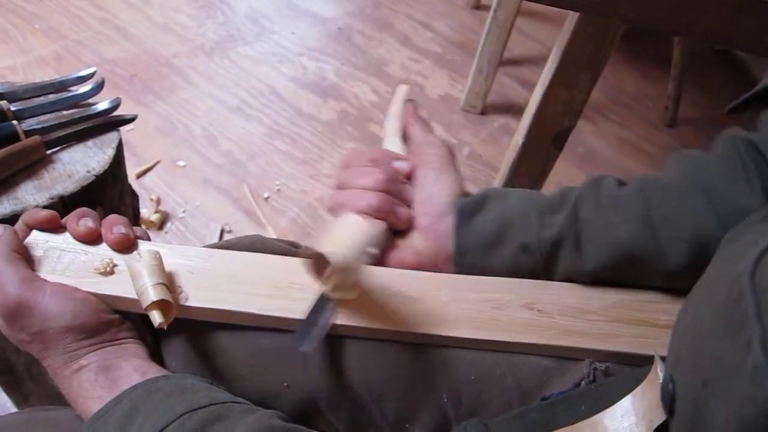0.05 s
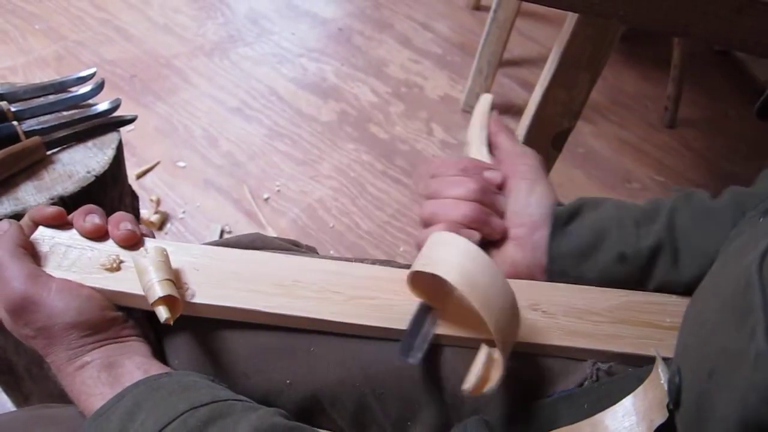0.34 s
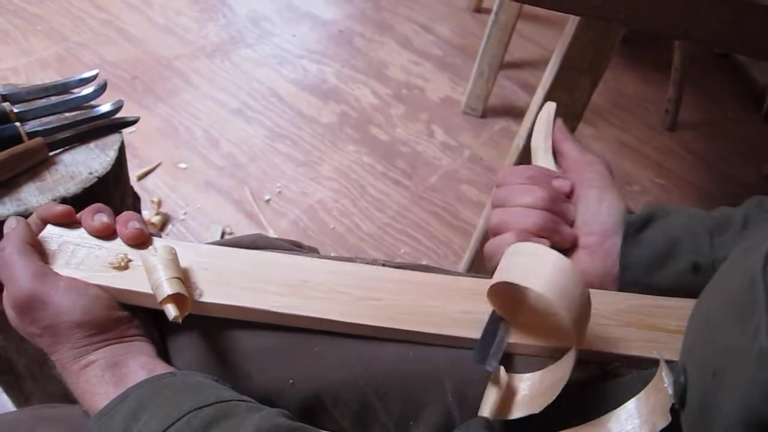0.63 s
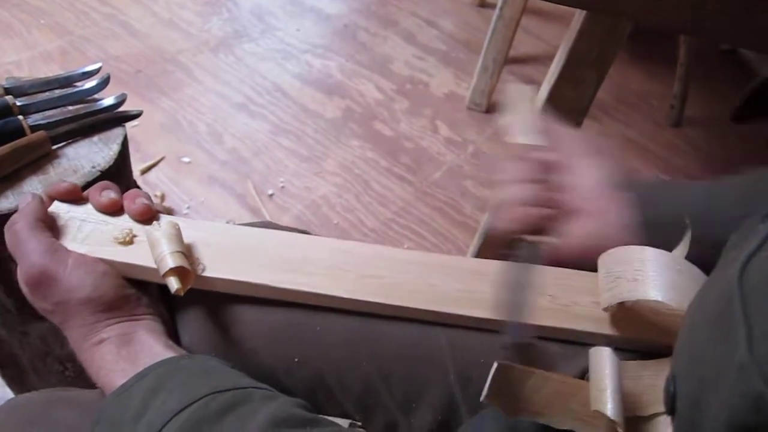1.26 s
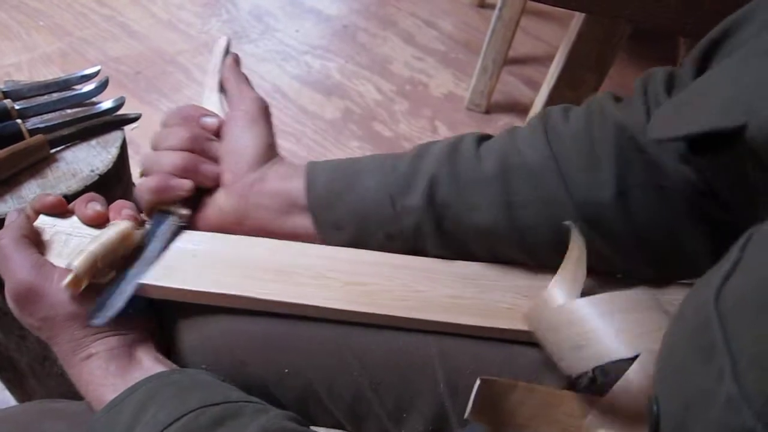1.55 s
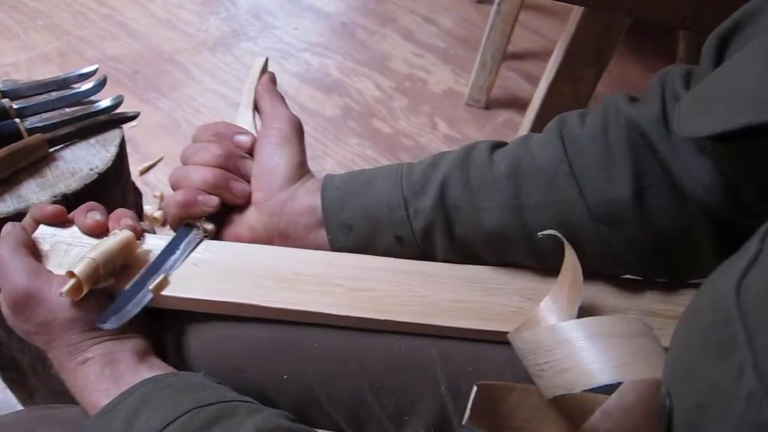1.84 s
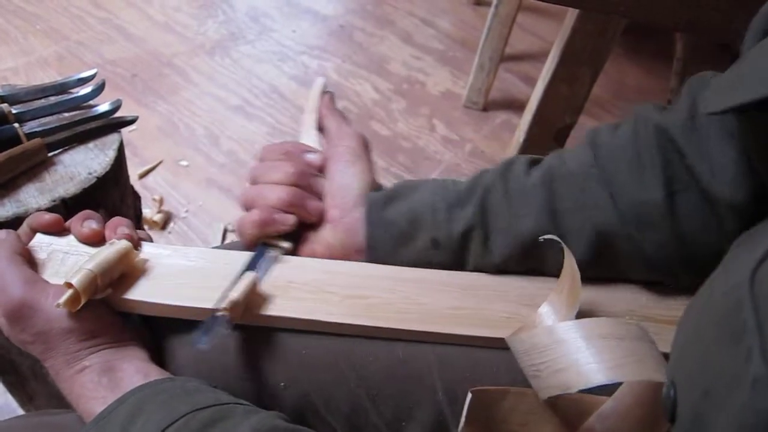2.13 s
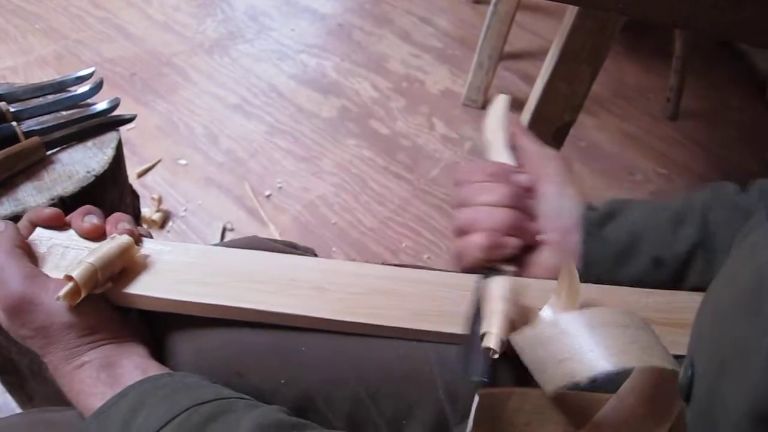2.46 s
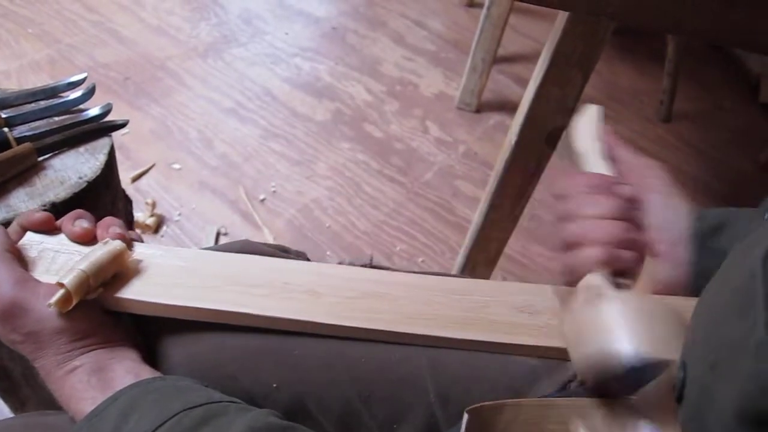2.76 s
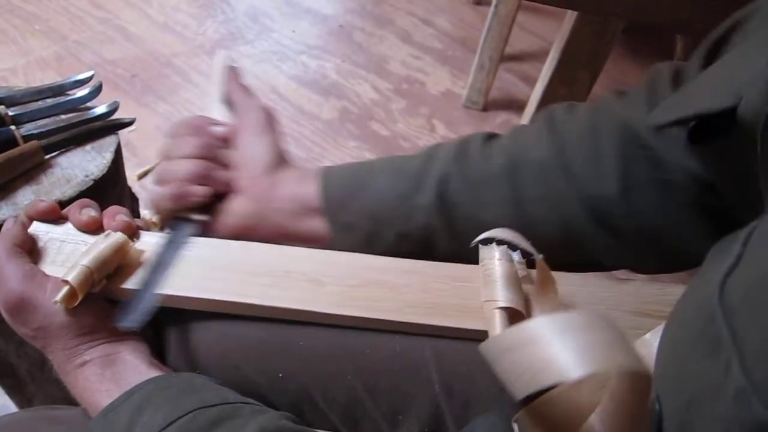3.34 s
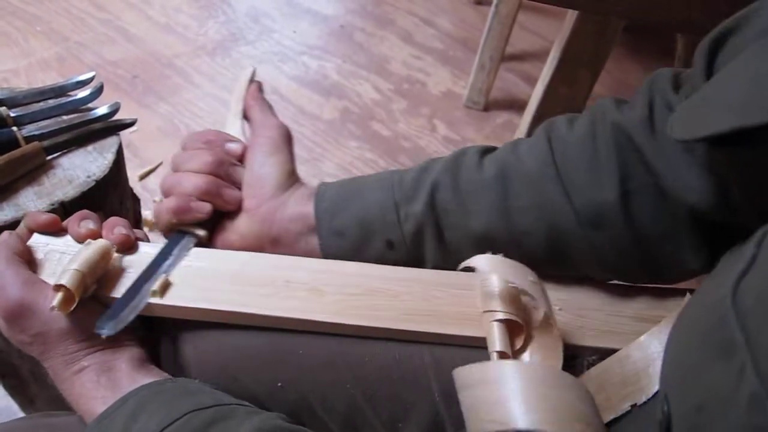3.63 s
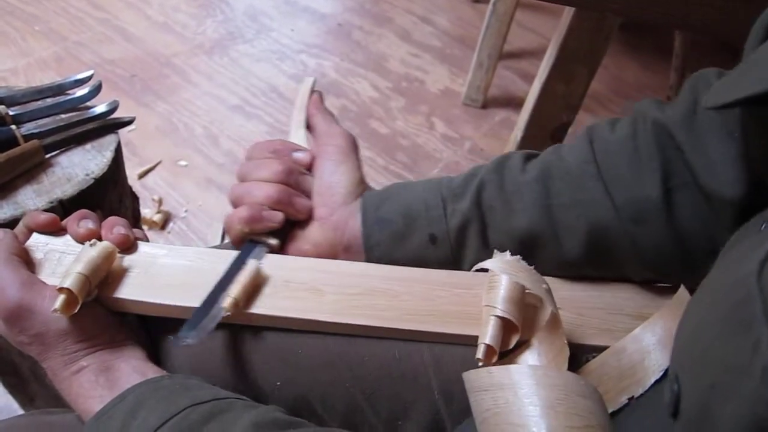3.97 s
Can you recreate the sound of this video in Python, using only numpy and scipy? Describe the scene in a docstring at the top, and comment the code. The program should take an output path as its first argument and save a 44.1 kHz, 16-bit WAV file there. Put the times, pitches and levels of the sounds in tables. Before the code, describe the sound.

Close knife carving on wood, rasping and crackling as shavings peel off in a small room.

```python
"""In a small room, close by, a knife is pulled along a piece of wood held on the lap.
The edge sticks and slips, breaking fibres: the wood thrums and rasps, the curling shaving crackles.
Two shavings are cut and torn free, a sleeve rustles as the arm goes back, and a third cut begins.
Now and then blade and wood knock lightly together."""
import sys
import numpy as np
from scipy import signal
from scipy.fft import rfft, irfft, next_fast_len
from scipy.io import wavfile
from scipy.ndimage import uniform_filter1d

SR = 44100
rng = np.random.default_rng(int(sys.argv[2]) if len(sys.argv) > 2 else 0)


def master_out(mix):
    """Clip the mix to full scale and print it as 16-bit PCM to the path in sys.argv[1]."""
    frames = np.transpose(np.atleast_2d(mix))
    ceiling = np.clip(frames, -1, 1)
    pcm = np.round(ceiling * 32767).astype(np.int16)
    wavfile.write(sys.argv[1], SR, pcm)


N = 176400
TIME = np.arange(N) / SR
FFT_SIZE = next_fast_len(N + SR // 2)
FREQS = np.maximum(np.arange(FFT_SIZE // 2 + 1) * SR / FFT_SIZE, 1)
LEFT_RIGHT = np.array([[1], [-1]])

# The pitches at which the wood rings: f/Hz, half width/Hz, boost/dB
WOOD_MODES = [(255, 16, 1.5), (405, 17, 3.5), (962, 29, 6), (1114, 8.2, 3.5), (1504, 5.7, 4), (2340, 13, 4)]
# The tone colour of a thick shaving (how strong each pitch is): f/Hz, level/dB
CRACKLE_COLOUR = [(500, -43), (2000, -11.5), (3300, -15), (4300, -4.5), (5800, -13.5), (7400, -7.5),
                  (8800, -7.5), (9700, 2), (11000, -1.5), (12800, -6), (14300, -11.5), (15800, -17)]


def from_db(db):
    """Turn decibels into a factor to multiply by."""
    return 10 ** (np.asarray(db) / 20)


def unit_level(x):
    """Scale a signal to an average (RMS) level of 1."""
    return x / np.sqrt(np.mean(x ** 2) + 1e-20)


def over_freqs(points):
    """Join rows of f/Hz, value into a curve over all frequencies."""
    hz, value = np.transpose(points)
    return np.interp(np.log(FREQS), np.log(hz), value)


def envelope(rows, column=1):
    """Loudness over time from a table's dB column, fading fast before and after its rows."""
    rows = np.array(rows)
    outside_s = np.abs(TIME - np.clip(TIME, rows[0, 0], rows[-1, 0]))
    fade = np.exp(-np.minimum(outside_s / .01, 50))
    return from_db(np.interp(TIME, rows[:, 0], rows[:, column])) * fade


def swell(at_s, half_s):
    """A brief rise and fall around one moment."""
    return np.exp(-np.minimum(((TIME - at_s) / half_s) ** 2, 60))


def wander(rate_hz):
    """A smooth random wobble with a typical size of 1."""
    slow = rfft(rng.standard_normal(FFT_SIZE)) / (1 + (FREQS / rate_hz) ** 4)
    return unit_level(irfft(slow, FFT_SIZE)[:N])


def grains(spread_db=3, per_second=9000, right_first_share=0.81):
    """Dense tiny clicks of uneven size, as mid (what both ears share) and side (how they differ)."""
    happens = rng.random(N) < per_second / SR
    sizes = happens * from_db(spread_db * np.minimum(rng.exponential(1, N), 4))
    clicks = rng.choice([-1, 1], N) * sizes / np.sqrt(uniform_filter1d(sizes ** 2, size=700) + 1e-9)
    direction = np.where(rng.random(N) < right_first_share, -1, 1)
    return np.array([clicks, clicks * direction])


def body_filter(colour, modes):
    """How an object answers a push: it rings afterwards, never before (minimum phase)."""
    ringing_db = sum(boost / (1 + ((FREQS - hz) / width) ** 2) for hz, width, boost in modes)
    cepstrum = irfft(np.log(from_db(over_freqs(colour) + ringing_db)), FFT_SIZE)
    return np.exp(rfft(2 * cepstrum[:FFT_SIZE // 2], FFT_SIZE) - cepstrum[0])


def radiate(force, colour, modes=()):
    """A force shakes an object, which colours the sound and sends it left and right."""
    # Stereo width, side compared with mid: f/Hz, level/dB
    width = [(30, 0), (120, -21.5), (1000, -19.5), (1850, -23), (2300, -3), (3100, 3), (4200, -7.5),
             (5000, -4), (6200, 0), (7600, -2), (10000, -1), (12200, -0.5), (14000, 4), (16000, -9)]
    # Balance, left minus right: f/Hz, level/dB
    balance = [(100, 1), (1500, .5), (4000, 1.5), (5000, 0.5), (6800, 2), (9800, 1.5), (11700, -3),
               (15000, 1)]
    body = body_filter(colour, modes)
    mid, side = rfft(force, FFT_SIZE) * body / np.sqrt(np.mean(np.abs(body) ** 2))
    stereo = mid + 1j * LEFT_RIGHT * side * from_db(over_freqs(width))
    return irfft(stereo * from_db(LEFT_RIGHT * over_freqs(balance) / 2), FFT_SIZE)[:, :N]


def room_tone():
    """The faint, steady hush of the room."""
    # Colour of the hush: f/Hz, level/dB
    colour = [(70, 1), (200, -6), (2000, -16.5), (16000, -24)]
    return radiate(from_db(-54) * rng.standard_normal((2, N)), colour)


def room_echo(x, fade_s=0.33, level_db=-19):
    """The room adds a short, faint echo, different on each side."""
    t = TIME[:SR // 3]
    tail = rng.standard_normal((2, len(t))) * from_db(-60 * t / fade_s) * (t > .004)
    tail = tail / np.sqrt(np.sum(tail ** 2, axis=1, keepdims=True))
    return from_db(level_db) * signal.fftconvolve(x, tail, axes=1)[:, :N]


def swish(rows, width_hz):
    """Rubbing makes a narrow band of noise whose pitch glides."""
    times, hz, _ = np.transpose(rows)
    phase = 2 * np.pi * np.cumsum(np.interp(TIME, times, hz)) / SR
    mid, side = [wander(width_hz) * np.cos(phase) + wander(width_hz) * np.sin(phase) for _ in range(2)]
    return envelope(rows, column=2) * (mid + 0.16 * side * LEFT_RIGHT)


def sleeve():
    """Cloth, loose shaving and blade rub lightly as the arm goes back for the next cut."""
    # The rustle, one list per arm movement: t/s, level/dB
    arm_moves = [
        [(.9, -34), (.97, -39.5), (1.02, -43), (1.09, -48.5), (1.15, -41), (1.22, -39.5), (1.27, -41),
         (1.34, -38.5), (1.48, -38), (1.52, -40.5), (1.55, -37), (1.6, -47), (1.7, -51)],
        [(2.88, -34), (2.94, -39.5), (3.0, -35.5), (3.05, -38), (3.14, -31.5), (3.19, -33.5), (3.25, -30),
         (3.33, -30.5), (3.37, -35), (3.44, -37.5), (3.47, -50), (3.52, -37.5)],
    ]
    # Colour of the cloth: f/Hz, level/dB
    colour = [(40, -12), (140, -6), (350, -2.5), (500, -10), (900, -8.5), (1330, -10.5), (1700, -2),
              (2100, -4), (2550, -6), (3000, -9.5), (4100, -5), (5300, -9.5), (7300, -14), (9000, -17.5),
              (10000, -13.5), (11800, -13.5), (13500, -22), (15800, -30)]
    # Sleeve and shaving sing as they slide, one list per band: t/s, f/Hz, level/dB
    slides = [
        [(1.2, 1580, -46), (1.42, 1718, -44), (1.55, 1637, -48)],
        [(1.2, 2600, -56), (1.35, 2386, -41), (1.5, 1966, -52)],
        [(3.135, 2720, -31.5), (3.205, 2090, -37.5), (3.26, 2150, -33), (3.3, 2230, -56)],
    ]
    # A thin hiss above them: t/s, f/Hz, level/dB
    hiss = [(3.18, 12300, -47), (3.26, 11500, -38), (3.36, 11400, -74)]
    flutter = from_db(1.52 * wander(rate_hz=42))
    rubbing = sum(envelope(move) for move in arm_moves) * flutter
    rustle = radiate(rubbing * grains(spread_db=2), colour)
    return rustle + sum(swish(rows, width_hz=150) for rows in slides) + swish(hiss, width_hz=640)


def knocks(click_decay_s=.0011, ring_decay_s=.0012):
    """Blade and wood touch, or a fibre snaps: a sharp click sets a short ring going."""
    # The light knocks, and at 0.94 s a fibre snapping with a ring: t/s, ring level/dB, ring f/Hz
    touches = [(0.7007, -28.5, 1700), (0.9439, -20, 6600), (1.54, -23, 4200), (1.6362, -23, 3600),
               (2.9159, -16.5, 5060), (3.479, -19, 3770), (3.633, -18, 3950), (3.9158, -12.5, 4930),
               (3.922, -9, 4500)]
    # Colour of the click: f/Hz, level/dB
    colour = [(60, -32.5), (300, -12), (800, -22), (1700, 0), (2800, -9), (4500, -2), (7000, -15),
              (11000, -5), (16000, -38)]
    sound = 0
    for at_s, db, hz in touches:
        age = np.clip(TIME - at_s, 0, .05)
        contact = (age > 0) * np.exp(-age / click_decay_s) * rng.choice([-1, 1], (2, N))
        click = radiate(from_db(-9.5) * contact, colour)
        ring = np.exp(-age / ring_decay_s) * np.sin(2 * np.pi * hz * age)
        sound += from_db(db) * (ring + click)
    return sound


def snaps(decay_s=.0005):
    """A thick fibre gives way all at once, sending a sharp crack through the shaving."""
    # Single fibres breaking: t/s, level/dB
    breaks = [(.0338, -15), (.1716, -14), (.1753, -6.5), (.2575, -16), (.288, -13), (.4686, -9),
              (.4928, -20), (.5571, -14.5), (.728, -14), (.8124, -13), (.944, -22)]
    force = sum(from_db(db) * (TIME >= at_s) * np.exp(-np.minimum(abs(TIME - at_s) / decay_s, 20))
                for at_s, db in breaks)
    return radiate(force * rng.choice([-1, 1], (2, N)), CRACKLE_COLOUR)


def sizzle():
    """Fine fibres part in a bright spray as the edge bites deep."""
    # Strength of the spray: t/s, level/dB
    spray = [(2.145, -29), (2.47, -31), (2.6, -58), (2.69, -36), (2.87, -42)]
    # Colour of the spray: f/Hz, level/dB
    colour = [(9000, -14), (12900, -5), (16000, -7)]
    return radiate(envelope(spray) * grains(), colour)


def stick_slip(rate_hz, depth_db):
    """The load on the edge builds up and lets go in uneven cycles."""
    uneven_hz = rate_hz * np.exp(0.41 * wander(rate_hz))
    phase = 2 * np.pi * np.cumsum(uneven_hz) / SR
    return unit_level(from_db(depth_db * (np.cos(phase) + 0.89 * wander(rate_hz=127))))


def tearing():
    """The shaving tears off the wood: its last fibres part in a broad, rough rush."""
    # The tears: start t/s, peak t/s, end t/s, start level/dB, peak level/dB, end level/dB
    tears = [(0.737, 0.9, 0.95, -38, -30, -45), (2.65, 2.726, 2.89, -34, -22.5, -30.5)]
    # Colour of a tear: f/Hz, level/dB
    colour = [(60, -10), (300, -3.5), (550, 4), (850, 1), (1300, 3), (2100, 5.5), (3000, -1), (4200, 2),
              (5000, 7), (6000, -4.5), (7200, -2), (10000, -9.5), (16000, -31)]
    pull = sum(envelope(list(zip(tear[:3], tear[3:]))) for tear in tears)
    force = pull * stick_slip(rate_hz=57, depth_db=1.2) * grains(spread_db=2.5)
    return radiate(force, colour, WOOD_MODES)


def shifting_colour(x, depth_db=2.5, patch_s=0.074, patch_hz=217):
    """Random patches of pitch grow louder or softer as the point of contact travels."""
    hz, times, spectrum = signal.stft(x, SR, nperseg=512)
    chance = rng.standard_normal(spectrum.shape[1:])
    blur_pitch = np.exp(-np.minimum(((hz[:, None] - hz) / (patch_hz / 2)) ** 2, 50))
    blur_time = np.exp(-np.minimum(((times[:, None] - times) / (patch_s / 2)) ** 2, 50))
    patches = unit_level(blur_pitch @ chance @ blur_time)
    return signal.istft(spectrum * unit_level(from_db(depth_db * patches)), SR)[1][:, :N]


def moving_resonance(x, width_hz=264, drop_share=0.46):
    """The wood's strongest pitch follows the edge: it is lifted while the other pitches drop."""
    # Path of that pitch: t/s, f/Hz, height above the other pitches/dB
    path = [(.1, 1670, 7), (.85, 1450, 3), (2, 1710, 2.5), (2.24, 1610, 2), (2.35, 1770, 2.5),
            (2.5, 1820, 6.5), (2.73, 1900, 4.5), (3.58, 1390, 3.5)]
    path_s, centre_hz, height_db = np.transpose(path)
    hz, times, spectrum = signal.stft(x, SR)
    peak = np.exp(-((hz[:, None] - np.interp(times, path_s, centre_hz)) / width_hz) ** 2)
    gain = from_db(np.interp(times, path_s, height_db) * (peak - drop_share))
    return signal.istft(spectrum * gain, SR)[1][:, :N]


def cutting(stick_s=0.0027, stick_db=-2, jump_thrum_db=-13.5):
    """Breaking fibres shake the wood and the shaving, in bursts where the edge jumps ahead."""
    # One list per stroke (the first cut stalls, so it takes two): t/s, rasp/dB, crackle/dB, thrum/dB
    strokes = [
        [(0, -31.5, -23, -37.5), (.12, -32, -27.5, -41.5), (.2, -34, -28.5, -40), (.39, -38.5, -29.5, -42),
         (.44, -32, -24, -42.5), (.48, -36.5, -32.5, -45), (.53, -40, -27.5, -44.5), (.62, -38, -31, -50.5),
         (.645, -52, -47, -56), (.67, -71, -76, -68)],
        [(.718, -53, -54, -68), (.73, -33, -27.5, -40), (.8, -28.5, -28.5, -39), (.875, -31.5, -23, -41),
         (.93, -59, -41, -69), (.98, -55, -47, -72)],
        [(1.68, -46, -46.5, -54), (1.85, -39, -41, -44), (1.91, -32.5, -37, -38.5), (1.99, -29.5, -35, -37),
         (2.09, -35, -35.5, -34.5), (2.18, -29, -28, -30.5), (2.27, -19, -29.5, -38.5), (2.41, -20, -26.5, -39),
         (2.505, -22.5, -31.5, -37), (2.525, -22, -32, -30.5), (2.56, -30.5, -32.5, -34),
         (2.6, -30, -34.5, -38.5), (2.66, -29.5, -32.5, -34.5), (2.7, -23.5, -26, -31.5), (2.76, -22, -29, -46),
         (2.8, -56, -35.5, -36), (2.88, -52, -32.5, -43), (2.93, -62, -62, -73)],
        [(3.49, -44.5, -49, -50), (3.565, -34.5, -36.5, -49), (3.582, -28, -32, -41.5), (3.67, -32, -33.5, -38),
         (3.73, -28, -33, -38), (3.84, -33.5, -34, -33.5), (3.91, -30, -28.5, -28.5), (3.94, -33, -33.5, -30),
         (4, -32, -34, -37)],
    ]
    # Sticking and slipping in each stroke: rate/Hz, depth/dB, spread of crackle sizes/dB
    chatter = [(54.8, 2, 4.5), (60, 2.4, 4.5), (63.1, 1.77, 3), (45, 1.5, 4.5)]
    # Jumps of the edge: t/s, rasp/dB, crackle/dB, half length/s
    jumps = [(.004, -21, -18, 0.0045), (0.031, -32, -21.5, 0.0042), (.061, -24, -17, 0.0035),
             (0.084, -26, -20.5, 0.0047), (0.101, -21, -26, .002), (0.15, -26.5, -31, 0.0037),
             (0.245, -29.5, -26, 0.0068), (0.271, -31, -19, 0.0028), (0.315, -28.5, -21.5, 0.0047),
             (0.449, -24.5, -18.5, .003), (0.4927, -20.5, -14.5, 0.0018), (0.531, -35, -24, 0.0019),
             (0.596, -31, -26.5, 0.0039), (.650, -37.5, -53, 0.0026), (0.727, -20.5, -18, 0.0028),
             (0.759, -17.5, -17, 0.0021), (0.782, -22.5, -25, 0.003), (1.979, -17.5, -34.5, 0.002),
             (2.033, -25, -35, 0.0029), (2.147, -25, -24.5, 0.002), (2.482, -16, -26.5, 0.0038),
             (2.498, -16, -34, 0.0026), (2.754, -16, -33, 0.0017), (2.789, -23.5, -33, 0.0018),
             (3.582, -26, -30, 0.0026), (3.793, -25.5, -34, 0.0035), (3.83, -25, -29, 0.0035)]
    # Colour of the wood's rasp: f/Hz, level/dB
    rasp_colour = [(150, -52), (480, -21.5), (660, -13), (800, -15), (1000, -9), (1250, -5), (1500, -6.5),
                   (1800, -3), (2100, -5), (2500, -6.5), (2950, -22.5), (3600, -16.5), (4200, -6),
                   (4800, -22.5), (5500, -17.5), (6300, -22), (7000, -18.5), (9000, -44), (15000, -37)]
    # Colour of the wood's low thrum: f/Hz, level/dB
    thrum_colour = [(25, -33), (50, -25), (65, -3), (110, -1), (240, 0), (390, -3.5), (500, -15),
                    (700, -10.5), (1200, -28)]
    # Colour of the later shavings, which slice more evenly: f/Hz, level/dB
    slice_colour = [(500, -35), (3000, -2), (4200, 3.5), (5600, -6), (7000, -2), (8800, -6.5), (9700, 2.5),
                    (11800, 2), (13600, -5.5), (15800, -14.5)]
    rasp_power, crackle_power, thrum_power, crackle_spread = np.zeros((4, N))
    # Just before a jump the edge holds and the cut goes quieter.
    holding = sum(swell(at_s - 2 * half_s - stick_s / 2, stick_s) for at_s, _, _, half_s in jumps)
    for stroke, (rate_hz, depth_db, spread_db) in zip(strokes, chatter):
        load = from_db(stick_db * holding) * stick_slip(rate_hz, depth_db)
        rasp_power += (load * envelope(stroke, column=1)) ** 2
        crackle_power += (load * envelope(stroke, column=2)) ** 2
        thrum_power += load * envelope(stroke, column=3) ** 2
        crackle_spread[TIME >= stroke[0][0]] = spread_db
    for at_s, rasp_db, crackle_db, half_s in jumps:
        burst = swell(at_s, half_s)
        rasp_power += burst * from_db(rasp_db) ** 2
        crackle_power += burst * from_db(crackle_db) ** 2
        thrum_power += burst * from_db(rasp_db + jump_thrum_db) ** 2
    shaving = np.sqrt(crackle_power) * grains(crackle_spread)
    thick = TIME < strokes[2][0][0]  # only the first shaving is thick
    crackle = radiate(shaving * thick, CRACKLE_COLOUR) + radiate(shaving * ~thick, slice_colour)
    rasp = radiate(np.sqrt(rasp_power) * grains(), rasp_colour, WOOD_MODES)
    rasp = moving_resonance(moving_resonance(rasp))  # twice, for double the height in dB
    thrum = radiate(np.sqrt(thrum_power) * grains(), thrum_colour, WOOD_MODES)
    return rasp + crackle + thrum


def scene():
    """Knife, wood and sleeve in a quiet room."""
    carving = shifting_colour(cutting() + sizzle() + tearing() + sleeve()) + snaps() + knocks()
    return carving + room_echo(carving) + room_tone()


def record(dry, notch_hz=8120, notch_width_hz=1040, cutoff_hz=15800):
    """Take a deep notch out of the treble and cut off the very top steeply."""
    notch = signal.iirnotch(notch_hz, notch_hz / notch_width_hz, fs=SR)
    top_cut = signal.ellip(16, .1, 130, cutoff_hz, fs=SR, output="sos")
    return signal.sosfilt(top_cut, signal.lfilter(*notch, dry))


dry = scene()
out = record(dry)
master_out(out)
```